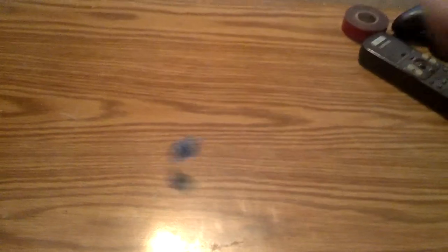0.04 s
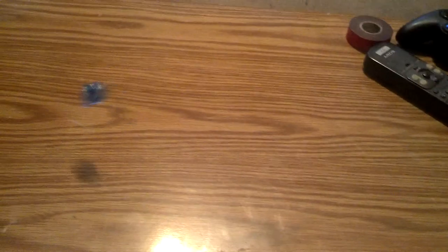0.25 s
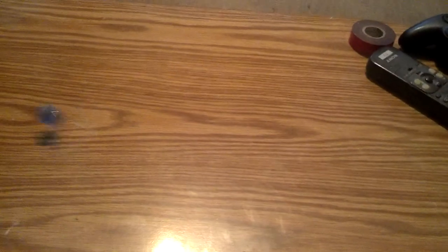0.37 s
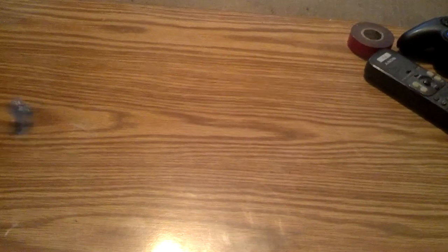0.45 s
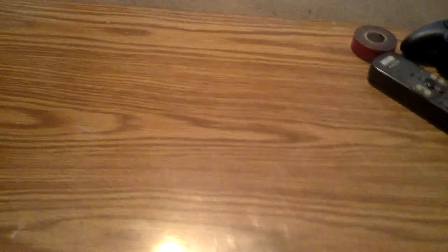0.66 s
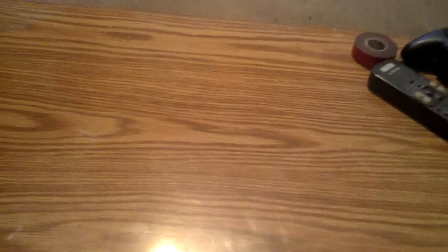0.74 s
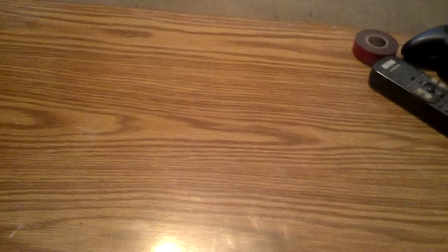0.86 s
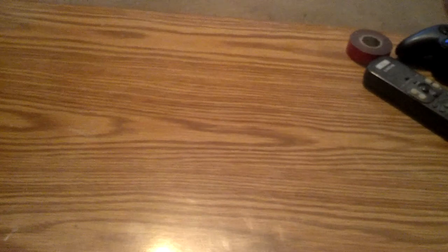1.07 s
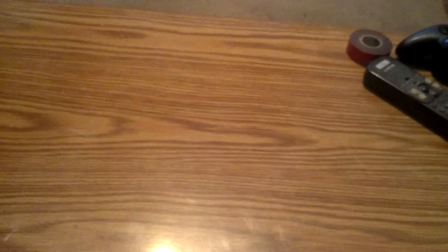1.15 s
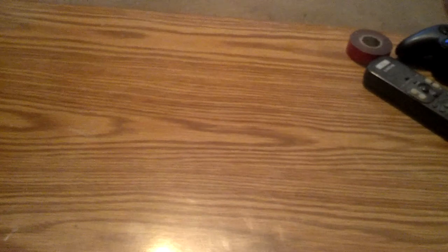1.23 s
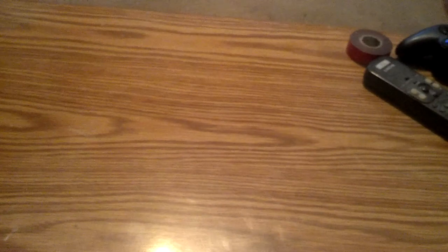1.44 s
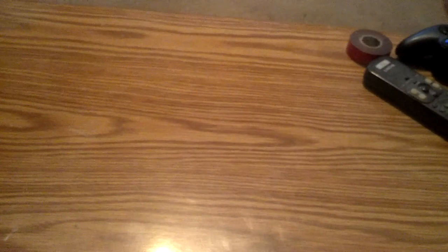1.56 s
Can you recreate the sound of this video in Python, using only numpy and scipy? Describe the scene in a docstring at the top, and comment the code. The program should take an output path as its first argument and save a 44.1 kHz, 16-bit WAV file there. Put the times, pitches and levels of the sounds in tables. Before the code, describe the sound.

A small hard die hits a wooden table right at the start, making four sharp, close clacks by about 0.6 seconds, each with a light knock from the wood. It then tumbles in ever quicker, softer taps while the tabletop faintly hums. From about 1.2 seconds it rattles lightly, settling at around 1.5 seconds. The room is quiet, with only a short echo.

```python
"""A small hard die clacks onto a wooden table in a quiet room: four big bounces, then it tumbles in
ever quicker, softer taps and rattles to rest. Each contact is a sharp tick with a near reflection,
a knock of the table top and a spray of sound thrown about by things on the table. Light touches
between the taps keep the wood humming, and a short room tail follows it all.
The treble of the right side is delayed to widen the stereo image."""
import sys
import numpy as np
from scipy import signal
from scipy.fft import rfft, irfft
from scipy.io import wavfile

SR = 44100
rng = np.random.default_rng(int(sys.argv[2]) if len(sys.argv) > 2 else 0)


def wav_out(sig):
    """Save sig, one row per channel (or a flat mono array), as 16-bit PCM at SR to the path in sys.argv[1]."""
    wavfile.write(sys.argv[1], SR, np.round(np.clip(np.atleast_2d(sig).T, -1, 1) * 32767).astype(np.int16))


N = 70560


def from_db(db):
    return 10 ** (np.asarray(db) / 20)


def at_hz(points, hz, column=1):
    """Read a column of a table on a log-frequency axis."""
    rows = np.array(points)
    return np.interp(np.log(np.maximum(hz, 1)), np.log(rows[:, 0]), rows[:, column])


def butter(x, hz, kind="low", order=2):
    """Causal Butterworth filter."""
    sections = signal.butter(order, np.clip(hz, 10, .45 * SR), kind, fs=SR, output="sos")
    return signal.sosfilt(sections, x + 1e-18)


def colour(x, eq):
    """Minimum-phase EQ through (freq_hz, gain_db) points: nothing rings ahead of an attack."""
    size = 4096
    cepstrum = irfft(np.log(from_db(at_hz(eq, np.fft.rfftfreq(size, 1 / SR)))))
    cepstrum[1:size // 2] *= 2
    cepstrum[size // 2 + 1:] = 0
    return signal.fftconvolve(x, irfft(np.exp(rfft(cepstrum))))[:len(x)]


def delay(x, seconds):
    """Shift later by whole samples."""
    return np.concatenate([np.zeros(round(seconds * SR)), x])[:len(x)]


def noise(eq):
    """Coloured noise of rms 1."""
    x = colour(rng.standard_normal(N), eq)
    return x / x.std()


def even_burst(envelope):
    """A noise burst of unit energy, its spectrum evened out so that no tone sticks out."""
    burst = rng.standard_normal(len(envelope)) * envelope
    flat = irfft(np.exp(1j * np.angle(rfft(burst))), len(burst))
    burst = flat * np.sqrt(envelope)
    return burst / np.linalg.norm(burst)


def ring(modes, t, spread_db=1.5):
    """Decaying modes of alternating polarity, each with a fresh strength."""
    hz, db, t60 = np.array(modes).T[:, :, None]
    sign = (-1) ** np.arange(len(hz))[:, None]
    envelope = from_db(db + spread_db * rng.standard_normal(db.shape) - 60 * t / t60)
    return (sign * envelope * np.sin(2 * np.pi * hz * t)).sum(0)


def background(floor_db=-67.5, throw_db=-51, throw_t60_s=0.57):
    """Quiet room tone, with the last of the throw dying away in it."""
    # room tone spectrum: freq_hz, gain_db
    floor_eq = [(25, -25), (100, -46), (200, 7), (400, -10), (1000, 0), (2500, -8), (6000, -10),
                (15000, -11.5)]
    # spectrum of the dying throw: freq_hz, gain_db
    throw_eq = [(100, -5), (250, -24), (600, -6), (1300, -3), (2400, -4.5), (5000, -10.5), (9000, -32),
                (16000, -27)]
    room_tone = from_db(floor_db) * np.array([noise(floor_eq), noise(floor_eq)])
    fade_db = -60 * np.arange(N) / SR / throw_t60_s
    return room_tone + from_db(throw_db + fade_db) * noise(throw_eq)


def room(x, wet_db=-10, predelay_s=0.0052, build_s=0.0012):
    """The room's diffuse stereo tail, lingering longest in the bass."""
    # reverb bands: freq_hz, level_db, t60_s, left_right_likeness (0-1)
    bands = [(80, 7, 0.4, .4), (135, -11, 0.57, 0), (270, 7.5, 0.14, 0), (480, 4.5, 0.26, 0),
             (1100, 1.5, 0.31, 1), (1680, .5, 0.26, 0.53), (2440, 0, 0.23, 0.96), (3490, -3, 0.28, 1),
             (4700, -4.5, 0.29, 0.9), (8040, -13, 0.28, 0.7), (11000, -13.5, 0.31, 1),
             (14000, -1.5, 0.18, 1)]
    t, tail = np.arange(SR * 2 // 3) / SR, 0
    edges_hz = np.geomspace(60, 17000, 17)
    for low, high in zip(edges_hz, edges_hz[1:]):
        hz = np.sqrt(low * high)
        envelope = from_db(at_hz(bands, hz) - 60 * t / at_hz(bands, hz, column=2))
        alike = np.clip(at_hz(bands, hz, column=3), 0, 1)
        mid, side = butter(rng.standard_normal((2, len(t))), [low, high], "band")
        stereo = np.sqrt(1 + alike) * mid + np.sqrt(1 - alike) * side * [[1], [-1]]
        tail = tail + stereo * envelope
    responses = [delay(channel * (1 - np.exp(-t / build_s)), predelay_s) for channel in tail]
    wet = np.array([signal.fftconvolve(x, ir / np.linalg.norm(ir))[:N] for ir in responses])
    return from_db(wet_db) * wet


def rolling(touches_per_s=2000):
    """Many light touches of the edges as the die tumbles and rocks to rest; they keep the table humming."""
    # level ride of the touches: time_s, level_db
    ride = [(.599, -48.5), (.748, -41.5), (.9, -38.5), (1.1, -34.5), (1.3, -33.5), (1.42, -33.5),
            (1.454, -40), (1.476, -34), (1.532, -32), (1.56, -39.5), (1.6, -39)]
    # tone of the rolling: freq_hz, gain_db
    roll_eq = [(50, -17), (120, 7), (200, 1.5), (340, -10), (450, 2), (650, 5), (900, 0.5), (1400, 3.5),
               (2400, 5.5), (3500, -6.5), (6000, -18), (10000, -23.5), (16000, -17)]
    # long mode of the table: pitch_hz, level_db, t60_s
    hum_mode = [(352.3, -47, 0.28)]
    level = from_db(np.interp(np.arange(N) / SR, *np.transpose(ride)))
    touches = (rng.random(N) < touches_per_s / SR) * rng.choice([-1, 1], N) * level
    hum = signal.fftconvolve(touches, ring(hum_mode, np.arange(SR // 2) / SR))[:N]
    return colour(touches, roll_eq) + hum


def wood(t, knock_db, clack_db, rattle_db):
    """The wood's answer to a hit: a hard clack, a pitched rattle and the knock of the table top."""
    # clack of die on wood: pitch_hz, level_db, t60_s
    clack_modes = [(2520, -19, .013), (7200, -27, .0013)]
    # pitched ring, strongest as the die rocks to rest: pitch_hz, level_db, t60_s
    rattle_modes = [(2170, -32.5, 0.022), (3215, -19.5, 0.016)]
    # table top: pitch_hz, level_db, t60_s
    table_modes = [(220, -57, 0.036), (262, -49.5, 0.022), (275, -53, 0.23), (341.8, -54.5, 0.16),
                   (515, -38.5, 0.021), (680, -36, 0.015), (960, -29, 0.016), (1163, -37, 0.021),
                   (1270, -39.5, 0.027), (1664, -27, 0.02), (1700, -37, 0.022), (1920, -37, 0.016)]
    clack = from_db(clack_db) * ring(clack_modes, t)
    rattle = from_db(rattle_db) * ring(rattle_modes, t)
    knock = from_db(knock_db) * ring(table_modes, t)
    return clack + rattle + knock


def contact(lowpass_hz, knock_db, snap_db, spot_hz, spot_db, clack_db, rattle_db):
    """One hit: tick and ringing wood, dulled by the softness of the contact, plus a sharp edge's snap."""
    # spectrum of the tick: freq_hz, gain_db
    tick_eq = [(60, -21.5), (250, 0), (430, -4), (650, -4.5), (1500, -0.5), (2500, -3.5), (4000, 5),
               (7000, 8.5), (10000, -3), (16000, -2.5)]
    scatter_t60_s, scatter_build_s = .016, .0013
    spot_cycles = 1.98  # until the struck spot's ring has died to 1/e
    t = np.arange(SR // 8) / SR
    click = signal.unit_impulse(len(t))
    tick = colour(click, tick_eq)
    reflection = from_db(-10) * delay(butter(tick, hz=3700, order=1), seconds=.002)
    # things on the table throw the sound about
    spray = even_burst(from_db(-60 * t / scatter_t60_s) * (1 - np.exp(-t / scatter_build_s)))
    scatter = from_db(2.5) * butter(spray, hz=(830, 6800), kind="band")
    damping = spot_hz / spot_cycles
    spot = from_db(spot_db) * 2 * damping / SR * np.exp(-damping * t) * np.cos(2 * np.pi * spot_hz * t)
    body = delay(wood(t, knock_db, clack_db, rattle_db), seconds=0.00043)
    snap = from_db(snap_db) * butter(click + from_db(4.5) * spray, hz=8000, kind="high")
    return butter(tick + spot + reflection + scatter + body, lowpass_hz) - snap


def bounces(places=4):
    """The die's distinct hits, dealt in turn to one track for each place on the table."""
    # contacts of the die; the later levels are relative to level_db:
    # start_s, level_db, lowpass_hz, knock_db, snap_db, spot_hz, spot_db, clack_db, rattle_db
    hits = [(0.0564, 0.5, 8400, 0, -12, 1750, 12.5, 0.5, -5.5),
            (.296, -1, 9900, -1, -15, 980, 8.5, 1, -5.5), (.4083, -5, 9700, 1, -9, 990, 11, 0, -14),
            (0.5621, -2, 5000, 3, -20, 4600, -2, 0, -26), (0.6804, -9, 3850, -3.5, -19, 1670, 9.5, 1, 2.5),
            (.755, -17.5, 10300, 8, -8, 7600, 12, -22, -20), (.8029, -10, 2620, -5, -27, 1620, 3, 3, -10),
            (.855, -16, 2610, 7, -38, 1560, 9, 3, 0), (.8955, -12.5, 3480, 3, -14.5, 1020, 6.5, 0, -4.5),
            (0.9597, -8.5, 3840, -2.5, -15, 1080, 3, -0.5, 0.5),
            (1.0059, -12, 3220, -9, -17, 1010, -3, 0, 2.5),
            (1.0354, -14, 3220, -12, -17, 1040, 5.5, 3.5, -15),
            (1.0773, -13, 4030, -1, -13.5, 1020, 1, -2.5, -22),
            (1.0938, -15.5, 3620, -8, -19, 1430, 2.5, 3.5, -11),
            (1.13, -17.5, 3070, -24, -16, 1620, 9, 4.5, -2), (1.1493, -16, 3060, 1, -13, 1060, 6, 0, 0),
            (1.185, -12.5, 2500, -6, -18.5, 3430, 12, -3, -1),
            (1.208, -25.5, 2780, -18, -15, 3400, 18, 10, 9),
            (1.235, -21.5, 2760, 7, -32, 3330, 16.5, -7, 6),
            (1.2433, -22.5, 3100, -15, -11, 3160, 16.5, 4, 6),
            (1.2685, -21, 2900, -24, -15, 3400, 14, 6, 7.5), (1.2882, -17, 4400, -7, -11, 3070, -12, -2, 6),
            (1.305, -18, 3200, -19, -20, 3330, 8.5, -12, -4),
            (1.338, -19, 5550, -25, -13.5, 3200, 10, 1, 5), (1.375, -20, 4500, -5, -14, 3270, 4.5, 2, -1),
            (1.4042, -24, 3000, -1, -30, 2005, 6, 7.5, 1), (1.4676, -25, 3620, -5, -15, 1390, 14, 7, 0)]
    tracks = np.zeros((places, N + SR))
    for place, track in enumerate(tracks):
        for start_s, level_db, *timbre in hits[place::places]:
            hit = from_db(level_db) * contact(*timbre)
            start = int(start_s * SR)
            track[start:start + len(hit)] += hit
    return tracks[:, :N]


def scene():
    """Die and table up close; the die travels, so each track stirs the room with a tail of its own."""
    tracks = [*bounces(), rolling()]
    return sum(track + room(track) for track in tracks) + background()


def record(dry, widen_s=.000363, widen_above_hz=1378, cutoff_hz=17400):
    """Microphone colour and balance; the right side's treble is delayed for width; the top is cut."""
    # microphone colour: freq_hz, gain_db
    mic_eq = [(30, -16), (100, -12.5), (150, -14.5), (200, 2), (1800, 0.5), (2450, 0), (3000, 3),
              (8000, -4), (9800, -5.5), (11000, -15), (12200, -10.5), (14200, -12.5), (16000, -18)]
    # stereo balance: freq_hz, left_minus_right_db
    balance = [(60, -12.5), (200, 13.5), (450, 0.5), (1200, -4), (2200, -2), (5500, -3), (15000, -3)]
    left = colour(colour(dry[0], mic_eq), [(hz, db / 2) for hz, db in balance])
    right = colour(colour(dry[1], mic_eq), [(hz, -db / 2) for hz, db in balance])
    above_hz = np.maximum(np.fft.rfftfreq(2 * N, 1 / SR) - widen_above_hz, 0)
    right = irfft(rfft(right, 2 * N) * np.exp(-2j * np.pi * above_hz * widen_s))[:N]
    high_cut = signal.cheby2(14, 70, cutoff_hz, fs=SR, output="sos")
    return signal.sosfilt(high_cut, [left, right])


dry = scene()
out = record(dry)
wav_out(out)
```